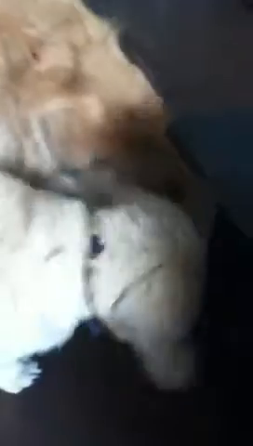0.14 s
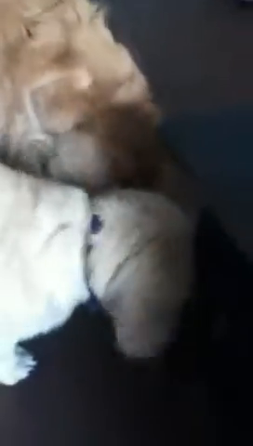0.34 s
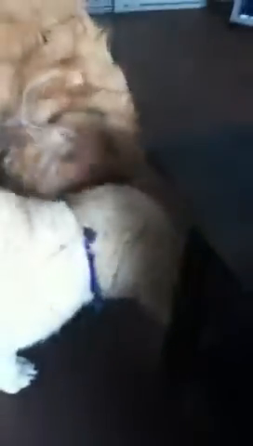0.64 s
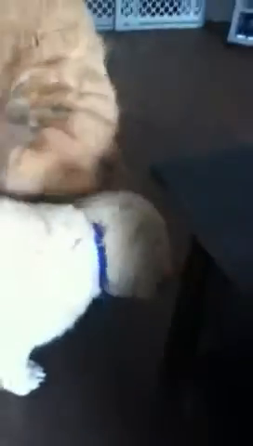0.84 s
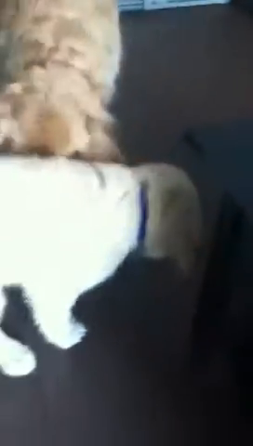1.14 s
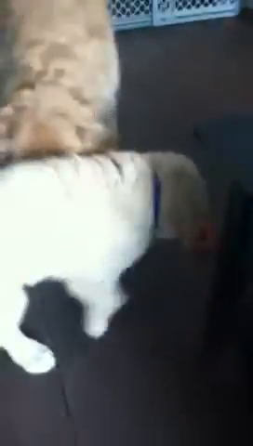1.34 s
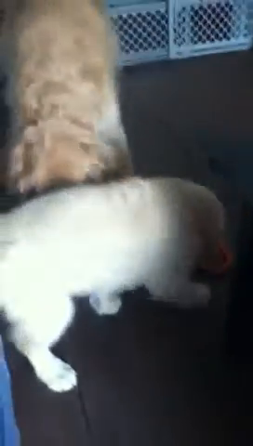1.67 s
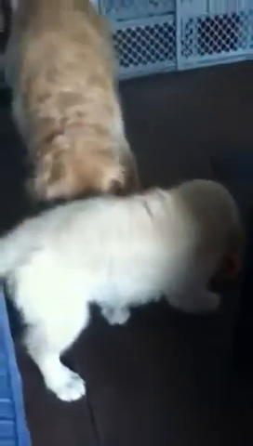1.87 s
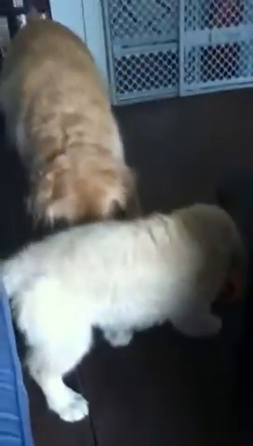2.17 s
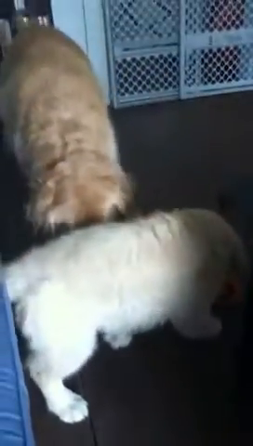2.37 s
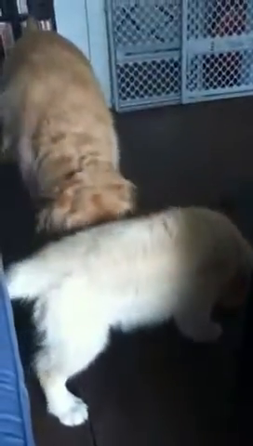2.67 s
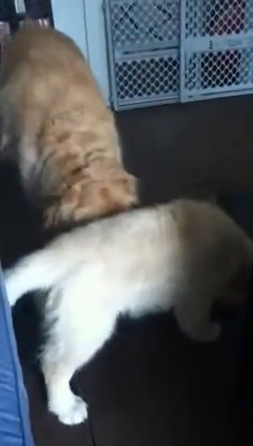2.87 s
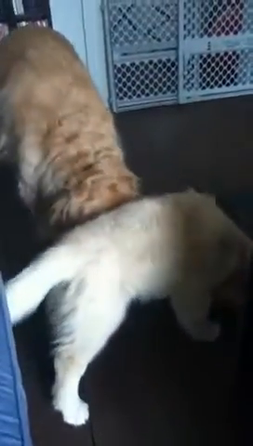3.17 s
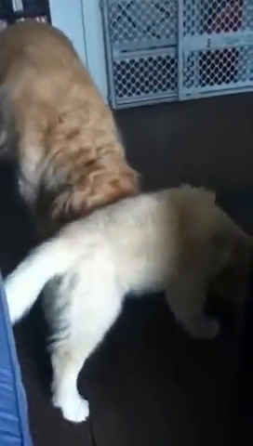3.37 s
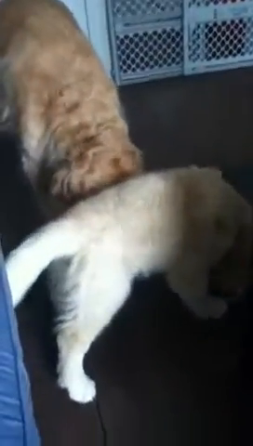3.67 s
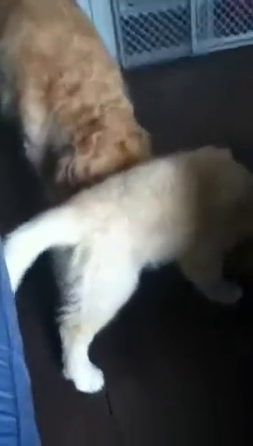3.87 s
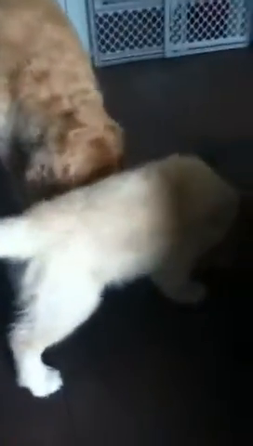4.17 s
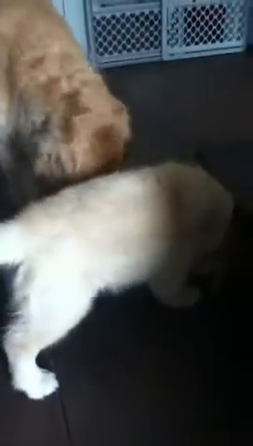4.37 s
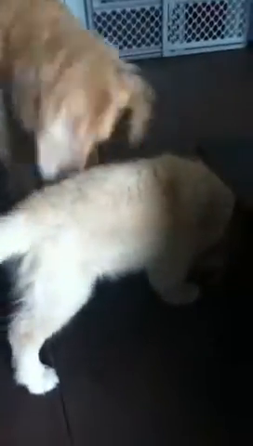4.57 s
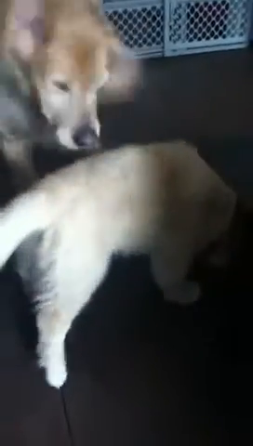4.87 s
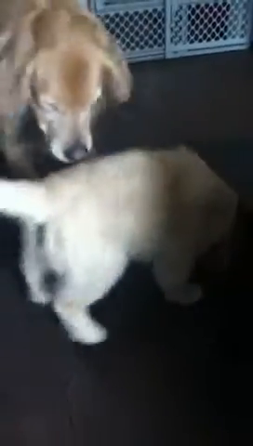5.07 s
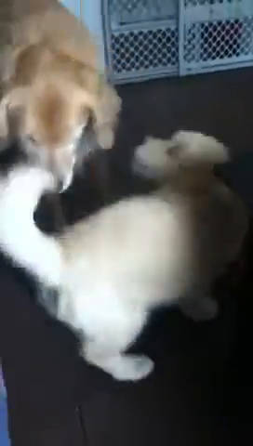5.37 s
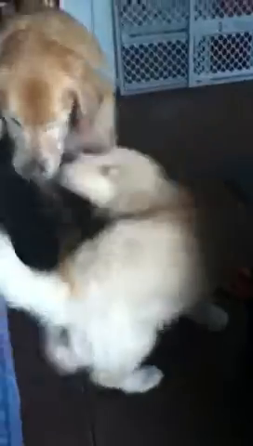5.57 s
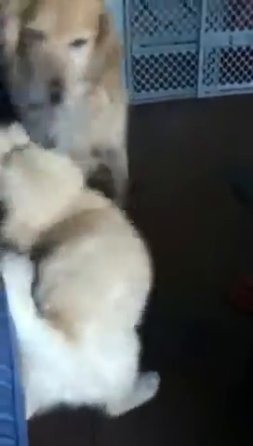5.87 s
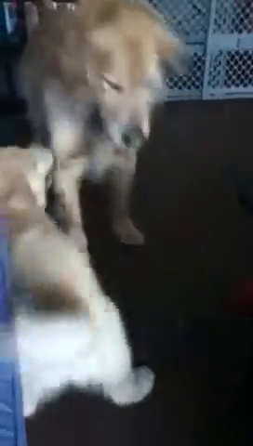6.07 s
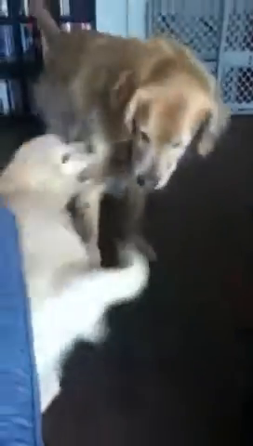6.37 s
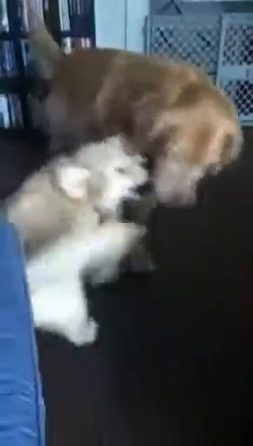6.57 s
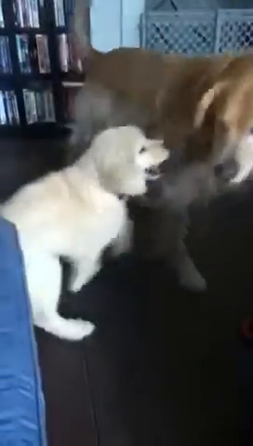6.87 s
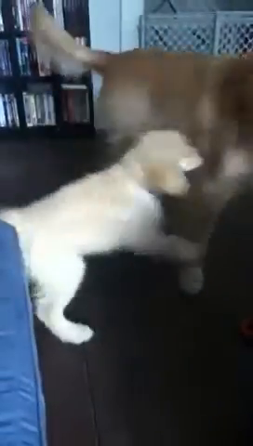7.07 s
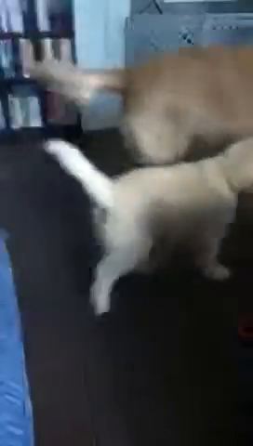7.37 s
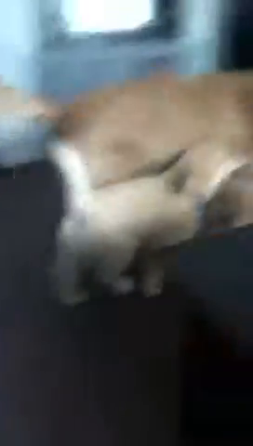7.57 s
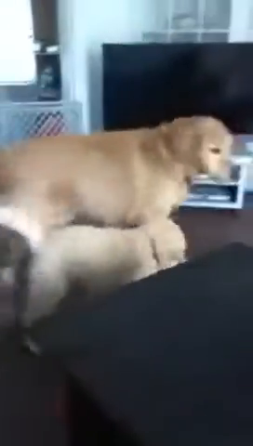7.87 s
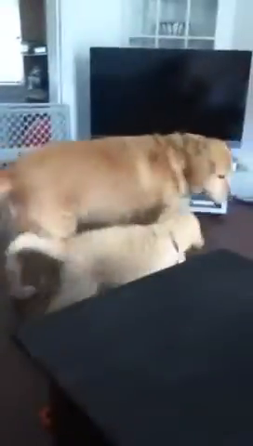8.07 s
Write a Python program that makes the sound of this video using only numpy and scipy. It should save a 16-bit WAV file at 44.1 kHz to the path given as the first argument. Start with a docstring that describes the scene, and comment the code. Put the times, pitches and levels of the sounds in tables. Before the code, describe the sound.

Two dogs tussle on wooden boards, heard up close by a phone. Light brushing, sparse claw snaps and soft knocks sit over steady house rumble and slight hiss. A brief, loud flurry of collar clicks and high ringing tags breaks the quiet, fading in under a second. Then stronger paw landings, dry scuffs and claw ticks crowd together, with short room reflections and stray tag tinkles.

```python
"""Soft brushing of fur and pads over a low hum comes first; then paws thud, scuff and tick on a wooden floor.
Two dogs tussle indoors near a phone. Claws and paws are short snaps, decaying tones and bursts of shaped noise.
One dog shakes its head: noise makes the collar rustle, and metal tags ring as sets of fading tones.
A small room answers with short noise tails, and steady filtered noise makes the hum."""
import sys
import numpy as np
from scipy import signal
from scipy.fft import rfft, irfft, next_fast_len
from scipy.io import wavfile
from scipy.ndimage import map_coordinates

SR = 44100
rng = np.random.default_rng(int(sys.argv[2]) if len(sys.argv) > 2 else 0)


def wav_record(signal):
    """Record a signal, one row per channel, as 16-bit PCM in the file named by sys.argv[1]."""
    frames = np.transpose(np.atleast_2d(signal))
    bounded = np.clip(frames, -1, 1)
    # unit amplitude maps onto the largest positive 16-bit level
    quanta = np.round(bounded * 32767).astype(np.int16)
    wavfile.write(sys.argv[1], SR, quanta)


N = 362943

# The tones of each metal tag or ring, before extra damping: pitch_hz, level_db, t60_s (time to fall 60 dB)
TAG_TONES = [
    [(6368, 0, .2), (12630, 2, .17), (15310, -20, .2)],
    [(9781, 0, .2), (14970, -8, .12)],
    [(3740, 0, .35), (5680, -6, .6)],
    [(4587, 3, .16), (10210, -4, .3)],
    [(7010, 0, .13), (15720, -18, .1)],
    [(8960, 0, .13), (9100, -3, .2), (8400, -4, .11), (8640, -6, .1), (8080, -8, .1)],
    [(11560, 0, .4), (10090, -1, .3), (14800, -10, .25), (8280, -16, .2)],
    [(13030, 0, .17), (12800, -8, .15)],
]


def amp(db):
    """Gain of a level in dB."""
    return 10 ** (np.asarray(db) / 20)


def unit(x):
    """Scale a sound to an average strength (rms) of 1."""
    return x / np.sqrt(np.mean(x ** 2) + 1e-20)


def along(points, hz):
    """Read a curve of (Hz, value) points, with pitch on a log axis."""
    point_hz, value = np.transpose(points)
    return np.interp(np.log(hz + 1), np.log(point_hz + 1), value)


def curves(rows):
    """One value per sample for each column after the time."""
    s, *columns = np.transpose(rows)
    return [np.interp(np.arange(N) / SR, s, column) for column in columns]


def wobble(rate):
    """A smooth random curve with this many random points a second."""
    points = rng.standard_normal(int(N * rate / SR) + 4)
    return map_coordinates(points, [np.arange(N) * rate / SR])


def filtered(x, response):
    """Change the strength of each frequency in x by a response curve."""
    size = next_fast_len(len(x) + 8192)  # spare room so the end does not wrap onto the start
    return irfft(rfft(x, size) * response(np.fft.rfftfreq(size, 1 / SR)), size)[:len(x)]


def burst(t, hz, octaves, treble_db):
    """Noise of rms 1 in a broad resonance, on a shelf of treble."""
    def response(f):
        resonance = np.exp(-.5 * (np.log2((f + 1) / hz) / octaves) ** 2)
        shelf = amp(treble_db) * f / (f + hz) / (1 + (f / 10500) ** 6)
        return resonance + shelf
    return unit(filtered(rng.standard_normal(len(t)), response))


def rasp(spectrum, grain_db, flutter_db):
    """Rubbing noise of rms 1: grit makes it spiky, stick and slip make it flutter."""
    roughness_db = grain_db * wobble(900) + flutter_db * wobble(45)
    grit = rng.standard_normal(N) * amp(roughness_db)
    return unit(filtered(grit, lambda hz: amp(along(spectrum, hz))))


def tail(seconds):
    """A fresh room answer of energy 1: noise in which each frequency dies at its own speed."""
    # How long the room rings: pitch_hz, t60_s
    room_decay = [(150, 0.23), (1000, 0.53), (4000, 0.22), (12000, 0.12)]
    hz, t, noise = signal.stft(rng.standard_normal(int(seconds * SR)), SR, nperseg=256)
    fade = amp(-60 * t / along(room_decay, hz)[:, None])
    answer = signal.istft(noise * fade, SR, nperseg=256)[1]
    return np.pad(answer / np.linalg.norm(answer), (130, 0))  # a delay of 130 samples


def add(track, s, sound, room_db):
    """Lay a sound and its room answer into the track at s seconds."""
    start = round(s * SR)
    track[start:start + len(sound)] += sound
    wet = amp(room_db) * signal.fftconvolve(sound, tail(seconds=.5))
    track[start:start + len(wet)] += wet


def claws():
    """Each claw gives a sharp snap that rings for a cycle or two around its own centre."""
    # Claws meeting the boards, before the room: start_s, peak_db, centre_hz
    claw_hits = [(0.416, -27, 2400), (0.451, -19, 3050), (0.511, -25.5, 4200), (0.839, -38, 7190),
                 (1.155, -41, 3680), (1.262, -30, 4650), (1.575, -24, 2230), (1.598, -32, 1810),
                 (2.09, -44.5, 790), (2.511, -30, 2340), (2.601, -35.5, 2400), (2.766, -33.5, 2690),
                 (3.17, -41.5, 900), (4.08, -44, 1800), (5.648, -34, 3100), (5.794, -31.5, 6320),
                 (6.547, -26.5, 5300), (6.862, -10, 6340), (6.874, -24, 2000), (6.884, -16.5, 3240),
                 (6.9, -16, 7000), (6.998, -19, 2800), (7.328, -12.5, 2900), (7.572, -18, 2290),
                 (7.921, -21.5, 2780)]
    out, t = np.zeros(N + 2 * SR), np.arange(400) / SR
    for s, db, hz in claw_hits:
        snap = .9 * (1 - t / .00006) * np.exp(-t / .00006)
        tone = np.sin(2 * np.pi * hz * t) * np.exp(-hz * t / 0.96)
        noise = 0.33 * burst(t, hz, 0.45, -1.0) * amp(-60 * t / 0.011)
        tick = snap + tone + noise
        add(out, s, amp(db) * tick / np.abs(tick).max(), room_db=-2.5)
    return out[:N]


def scuffs():
    """A pad rasps over the boards: noise swells as the pad gathers speed, snags on grit and dies as it lets go."""
    # Paw scuffs, before grit and wood colour them: peak_s, level_db, centre_hz, rise_s
    strokes = [(0.418, -35.5, 2300, 0.0051), (0.453, -40.5, 2760, 0.017), (1.03, -50.5, 2760, 0.011),
               (1.156, -37.5, 2740, 0.0027), (1.3, -51, 5500, 0.021), (1.44, -55, 5300, .04),
               (1.576, -39, 1630, 0.0012), (1.72, -56.5, 3000, 0.031), (1.926, -53, 1590, 0.0027),
               (2.328, -59.5, 1430, 0.0071), (2.419, -58.5, 2820, 0.026), (2.51, -41, 2190, 0.001),
               (2.765, -48.5, 1960, 0.0029), (2.849, -51.5, 1110, 0.065), (3.4, -54.5, 2600, 0.12),
               (3.93, -58, 1500, 0.0059), (4.418, -59, 2680, 0.044), (4.895, -38, 1800, 0.0031),
               (4.927, -41, 1480, 0.0033), (6.129, -54.5, 3500, 0.0061), (6.451, -44.5, 4650, 0.054),
               (6.538, -52, 4140, 0.016), (6.688, -44.5, 2760, 0.035), (6.769, -41.5, 1600, 0.012),
               (6.892, -35.5, 5500, 0.018), (7.005, -60, 1600, 0.012), (7.196, -30, 2440, 0.018),
               (7.345, -32.5, 2980, 0.079), (7.559, -27.5, 2800, 0.049), (7.679, -54, 2150, 0.022),
               (7.829, -37.5, 2040, 0.0064), (7.924, -31.5, 2740, 0.0024), (7.981, -40, 3500, 0.027),
               (8.163, -32.5, 1240, 0.018)]
    # What scuffed boards favour: centre_hz, width_hz, level_db
    wood_tones = [(780, 360, 7.5), (2250, 36, -6), (2760, 74, -2.5), (3260, 240, -13), (3730, 91, -5),
                  (4180, 14.4, -33), (4700, 19, -15)]
    let_go_t60_s, let_go_per_rise = 0.23, 0.91  # time to fall 60 dB, longer after a slow rise (s per s)
    treble_db, treble_db_per_octave = -21.5, 19.5  # treble for a centre of 2500 Hz; higher scuffs hiss more
    colour_db, colour_hz = 2.5, 250.4  # random bumps in each spectrum, as on other boards: depth and spacing
    out = np.zeros(N + 2 * SR)
    grit = amp(1.8 * wobble(700) + 1.96 * wobble(90))
    t = np.arange(-SR // 4, SR // 2) / SR  # zero at the peak
    for s, db, hz, rise in strokes:
        t60 = let_go_t60_s + let_go_per_rise * rise
        hiss_db = treble_db + treble_db_per_octave * np.log2(hz / 2500)
        swell = np.exp(-(t / max(rise, .0005)) ** 2)
        stroke = np.where(t < 0, swell, amp(-60 * np.abs(t) / t60))
        bumps = rng.standard_normal(200)

        def colour(f):
            return amp(colour_db * map_coordinates(bumps, [f / colour_hz], mode='wrap'))
        rub = filtered(burst(t, hz, 1.0, hiss_db), colour)
        add(out, s + t[0], amp(db) * stroke * unit(rub), room_db=-7.5)

    def wood(f):
        return 0.82 + sum(0.4 * amp(db) / (1 + (2 * (f - hz) / width) ** 2) for hz, width, db in wood_tones)
    return filtered(out[:N] * grit, wood)


def thuds():
    """A soft paw makes a board knock at its pitch and two overtones; the floor rumbles and its joists boom."""
    # Paws landing, before rumble, joists and room join in: start_s, knock_db, board_pitch_hz
    landings = [(0.229, -36, 352), (1.572, -43.5, 181), (1.928, -39.5, 265), (3.769, -44.5, 164),
                (4.115, -35.5, 197), (4.165, -43.5, 314), (4.26, -48, 305), (4.85, -35, 316),
                (4.909, -37, 203), (4.928, -40, 608), (5.169, -44.5, 189), (5.646, -27, 201.4),
                (6.134, -36.5, 151), (6.801, -36, 181), (6.867, -26.5, 237), (6.998, -32.5, 362),
                (7.189, -26, 216.5), (7.255, -28.5, 206), (7.392, -34, 257), (7.488, -32.5, 242),
                (7.829, -33, 227), (7.934, -32, 417), (7.969, -31.5, 215), (8.154, -28, 359.5)]
    knock_t60_s, rumble_t60_s, joist_t60_s = 0.12, 0.32, 0.25  # time to fall 60 dB
    rumble_db, joist_db = -9.5, -12  # relative to knock_db; the joist value is for a board of 220 Hz
    joist_hz, joist_db_per_octave = 100.4, -10.5  # higher, lighter knocks shake the joists less
    out, t = np.zeros(N + 2 * SR), np.arange(SR // 2) / SR
    for s, db, hz in landings:
        board = np.sin(2 * np.pi * hz * t)
        board += .5 * np.sin(2 * np.pi * 1.6 * hz * t)
        board += 0.36 * np.sin(2 * np.pi * 3.3 * hz * t)
        knock_fade = amp(db - 60 * t / knock_t60_s) * (1 - np.exp(-t / 0.00042))
        knock = knock_fade * board / np.abs(board).max()
        rumble_fade = amp(db + rumble_db - 60 * t / rumble_t60_s) * (1 - np.exp(-t / 0.0027))
        rumble = rumble_fade * burst(t, hz, 0.85, -33.5)
        boom_db = db + joist_db + joist_db_per_octave * np.log2(hz / 220)
        joist_fade = amp(boom_db - 60 * t / joist_t60_s) * (1 - np.exp(-t / 0.013))
        joist = joist_fade * burst(t, joist_hz, 0.42, -59)
        add(out, s, knock + rumble + joist, room_db=-10.0)
    return out[:N]


def ring(modes, t, spread_db, damping):
    """A struck tag rings in several tones that beat and waver; fur damps the first moments fastest."""
    waver, swing_hz = 0.0017, 25  # share by which the pitch drifts, and how often
    sway = t + waver * np.sin(2 * np.pi * (swing_hz * t + rng.random())) / (2 * np.pi * swing_hz)
    out = 0
    for hz, db, t60 in modes:
        beat = 1 + .45 * np.cos(2 * np.pi * rng.uniform(35, 110) * t)
        fade = amp(db + spread_db * rng.standard_normal() - 60 * damping * t / t60)
        out = out + beat * fade * np.sin(2 * np.pi * (hz * sway + rng.random()))
    return out * (1 - np.exp(-t / 0.00047)) * (0.41 + 0.55 * np.exp(-t / 0.019))


def knocks():
    """Clips and buckles click with a spike and a short rattle of noise; struck tags ring."""
    # Hard collar parts clicking, before the room: start_s, peak_db, centre_hz
    clicks = [(2.18, -29, 8800), (2.197, -27.5, 8600), (4.635, -34, 6950), (4.6874, -26, 8200),
              (4.7227, -24, 6960), (4.7363, -19, 9400), (4.808, -14.5, 7950), (4.832, -11, 8820),
              (4.8657, -14.5, 8130), (4.8925, -12, 8000), (4.906, -13, 7590), (4.9292, -13, 6480),
              (4.9775, -3.5, 8740), (4.994, -8, 9850), (5.013, -13, 8960), (5.0664, -21, 7440),
              (5.0815, -24, 7000), (5.1982, -13.5, 7200), (5.2257, -11.5, 9500), (5.278, -10.5, 8500),
              (5.404, -20, 8000), (5.872, -26.5, 9300), (6.0142, -37.5, 7200), (6.0667, -20, 8560),
              (6.216, -26, 9700), (6.281, -23, 8400), (6.3144, -25.5, 8350), (7.072, -16, 8150),
              (7.089, -24, 8150), (7.1586, -22.5, 9500), (7.7604, -32, 7640), (7.7843, -26, 7900),
              (8.0164, -22, 10400), (8.0494, -35, 11500), (8.113, -28, 8860)]
    # Blows on each tag or ring, in the order of TAG_TONES: start_s, level_db (before the tag's own tone levels)
    tag_blows = [
        [(4.9302, -27), (4.9766, -28), (5.0644, -31), (5.0809, -14.5), (5.2779, -28)],
        [(4.9294, -28), (4.9756, -23), (5.0454, -30), (5.2265, -29), (5.2774, -21)],
        [(5.1632, -33), (5.2789, -31.5), (5.405, -46)],
        [(5.0689, -34), (5.198, -39), (5.4051, -46.5), (5.8721, -50)],
        [(4.808, -19), (4.9292, -27), (5.0664, -18), (5.1667, -34), (6.2801, -45)],
        [(2.1794, -44), (2.1999, -40.5), (4.8319, -26), (4.9444, -20), (4.9766, -32), (5.0294, -42),
         (5.1342, -42), (7.0723, -24.5), (7.0894, -33)],
        [(5.4844, -33.5), (6.3844, -47), (6.7456, -45.5), (6.8014, -36), (7.9444, -43), (7.9748, -36)],
        [(4.9766, -16.5), (5.0814, -29), (5.1971, -39.5), (5.2789, -38), (6.0654, -48), (7.0878, -37)],
    ]
    rattle_t60_s, click_low_hz = 0.018, 2830  # small hard parts give little below this pitch
    out, t = np.zeros(N + 2 * SR), np.arange(SR // 2) / SR
    for s, db, hz in clicks:
        rattle = amp(-60 * t / rattle_t60_s) * (1 - np.exp(-t / 0.0021))
        spike = 1.77 * amp(-60 * t / 0.0019)
        noise = filtered(burst(t, hz, 0.23, -0.45), lambda f: f * f / (f * f + click_low_hz ** 2))
        click = (rattle + spike) * noise
        add(out, s, amp(db) * click / np.abs(click).max(), room_db=-2.5)
    for blows, modes in zip(tag_blows, TAG_TONES):
        for s, db in blows:
            add(out, s, amp(db) * ring(modes, t, spread_db=3.5, damping=1.14), room_db=-9)
    return out[:N]


def shake():
    """The collar rustles as noise; many small random touches keep light tags chattering at each head swing."""
    # Tone colour of the collar's rustle: pitch_hz, level_db
    collar_colour = [(290, -62), (500, -19.5), (3700, -2), (5310, -4.5), (6330, 6), (11600, -1.5),
                     (12900, -21), (16000, -33)]
    start_s, peak_s, end_s = 4.8, 5.04, 5.6
    settle_s = 0.28  # the shake fades out over its last moments
    gather_db_per_s, tire_db_per_s = 120, 41  # effort climbs to the peak and falls after it
    rustle_db, chatter_db = -32.5, -30  # collar rustle and tag touches at full effort, at each turn of the head
    chatter_tires = 1.05  # the tags quieten faster than the collar (power of the effort)
    swings_per_s, swing_db = 7.9, 2.5  # the tags chatter most at each turn of the head
    late = np.arange(N) / SR - peak_s  # seconds after the peak
    shaking = (late > start_s - peak_s) & (late < end_s - peak_s)
    slope = np.where(late < 0, gather_db_per_s, -tire_db_per_s)
    effort = shaking * amp(slope * late * shaking)
    effort = effort * np.clip((end_s - peak_s - late) / settle_s, 0, 1)
    turn_db = swing_db * (np.cos(2 * np.pi * swings_per_s * late) - 1)
    t = np.arange(SR // 4) / SR
    chatter = np.zeros(N)
    for modes in TAG_TONES[:2] + TAG_TONES[4:6]:
        touched = rng.random(N) < 90 / SR  # about 90 touches a second on each tag
        touch_db = 1.6 * rng.standard_normal(N) + chatter_db + turn_db
        touches = touched * effort ** chatter_tires * amp(touch_db)
        chatter += signal.fftconvolve(touches, ring(modes, t, spread_db=1, damping=2.8))[:N]
    rustle = amp(rustle_db + 0.27 * turn_db) * effort * rasp(collar_colour, grain_db=1.0, flutter_db=2.0)
    return chatter + rustle


def slides():
    """Fur and pads brush softly as noise while shifting weight murmurs in the floor."""
    # How busily the dogs shift about: time_s, level_db of the brushing fur and pads
    bustle = [(0.0, -52), (0.2, -55), (0.55, -66), (1.25, -54.5), (1.63, -67), (2.7, -65), (3.7, -71),
              (4.4, -65), (5.5, -77), (5.95, -62.5), (7.26, -51), (7.39, -51), (7.65, -54.5), (8.16, -47),
              (8.23, -44)]
    # Tone colour of the brushing: pitch_hz, level_db
    pad_colour = [(290, -47), (500, 3), (2330, -4.5), (7000, -5), (12900, -16), (15300, -59), (16000, -57)]
    # Tone colour of the murmuring floor: pitch_hz, level_db
    board_colour = [(24, -44), (40, -6.5), (205, -3.5), (298, -7.5), (443, -13.5), (518, -16.5),
                    (1200, -16), (1560, -37), (2640, -120)]
    mean_murmur_db, murmur_follows = -60, 0.57  # level at the mean bustle; share of its swings followed
    busy_db, = curves(bustle)
    murmur_db = mean_murmur_db + murmur_follows * (busy_db - busy_db.mean())
    brushing = amp(busy_db) * rasp(pad_colour, grain_db=-1.0, flutter_db=1.0)
    murmur = amp(murmur_db) * rasp(board_colour, grain_db=-2.0, flutter_db=4.1)
    return brushing + murmur


def hum():
    """House rumble and microphone hiss: filtered noise whose level drifts slowly."""
    # Tone colour of rumble and hiss: pitch_hz, level_db
    hum_colour = [(15, -47), (25, -4), (149, 0.5), (285, -4), (451, -10), (988, -17), (1160, -30),
                  (1260, -18), (10400, -23.5), (14800, -26.5), (16000, -41)]
    level_db = -58 + .8 * wobble(3)
    return amp(level_db) * rasp(hum_colour, grain_db=.2, flutter_db=.3)


def scene():
    """All sources, heard by one microphone; rubbing sounds share one room answer."""
    rubbing = slides() + shake()
    wet = amp(-11.5) * signal.fftconvolve(rubbing, tail(seconds=.5))[:N]
    return (rubbing + wet + scuffs() + claws() + thuds() + knocks() + hum())[None]


def record(dry):
    """The phone's microphone loses the deep bass and keeps nothing above its band limit."""
    top_hz, bass_hz = 15900, 60

    def response(hz):
        return (hz < top_hz) * hz ** 2 / (hz ** 2 + bass_hz ** 2)
    return filtered(dry[0], response)[None]


dry = scene()
out = record(dry)
wav_record(out)
```